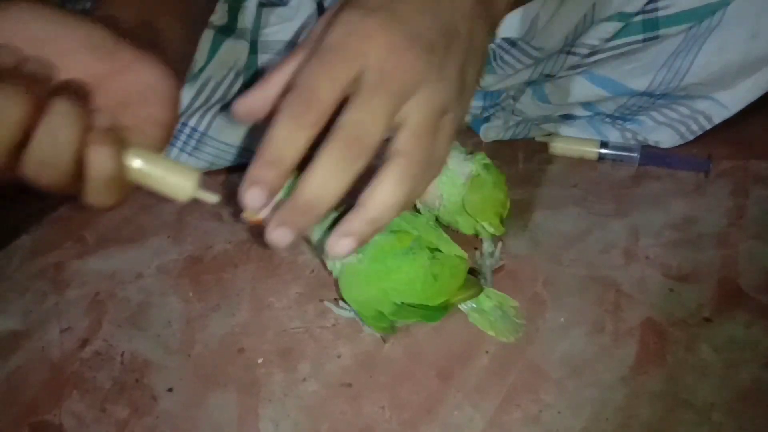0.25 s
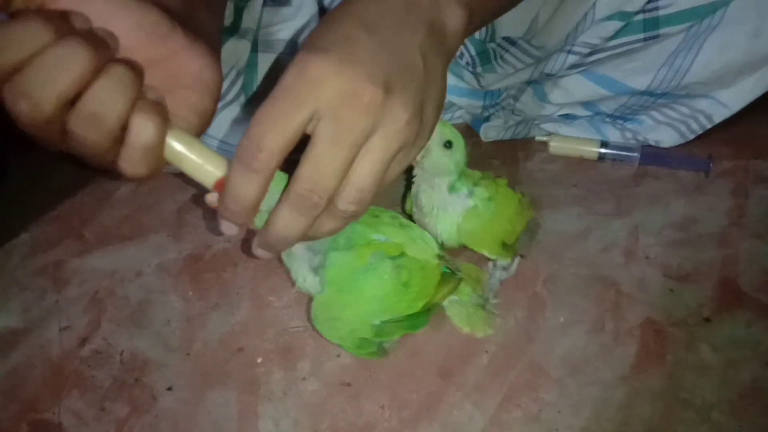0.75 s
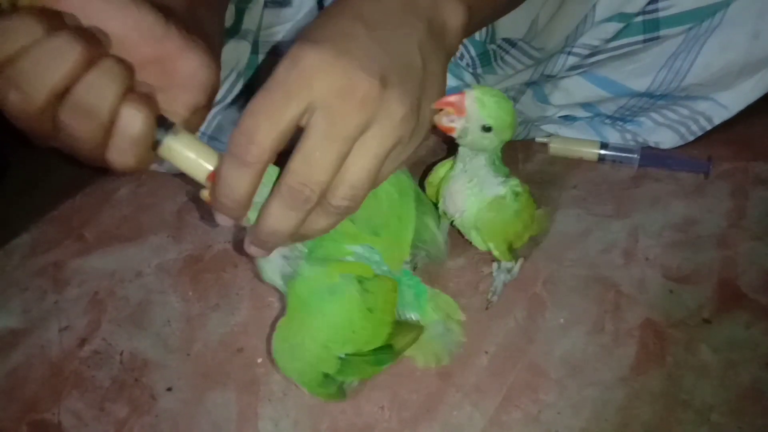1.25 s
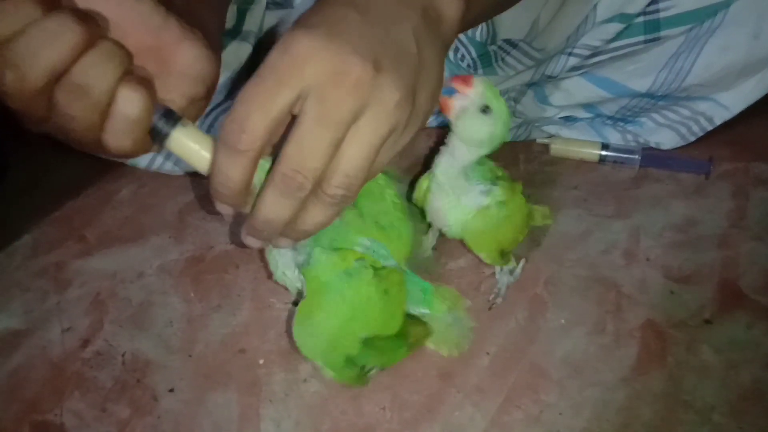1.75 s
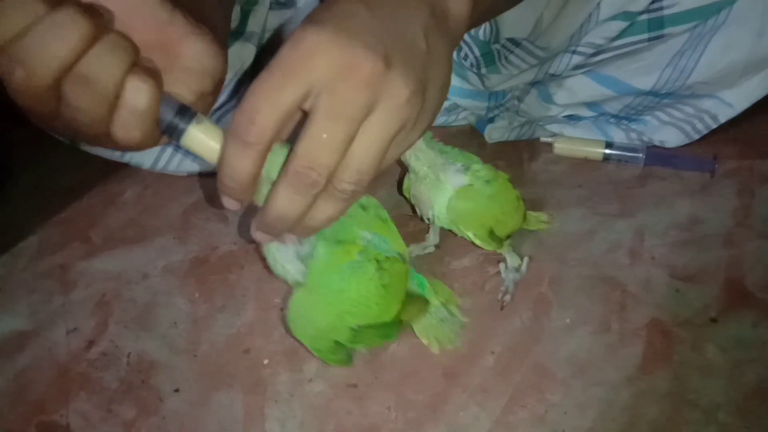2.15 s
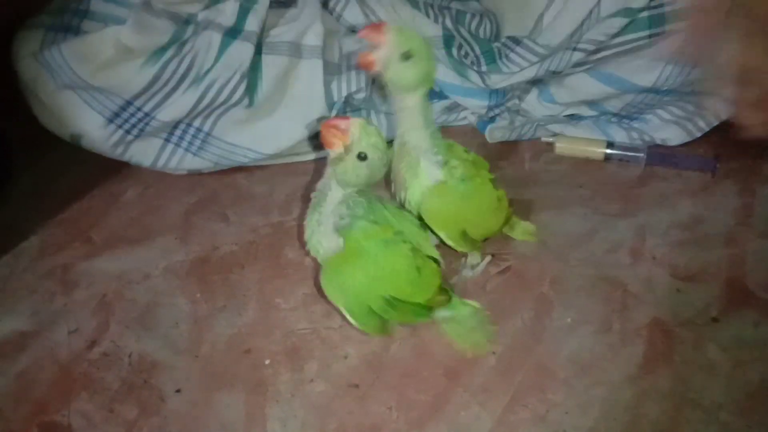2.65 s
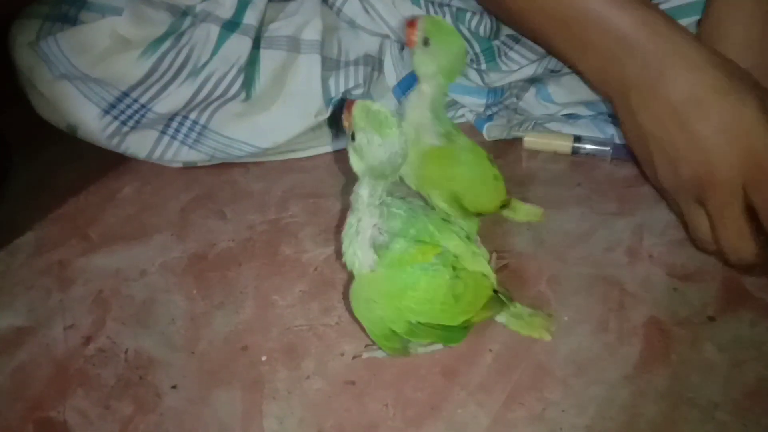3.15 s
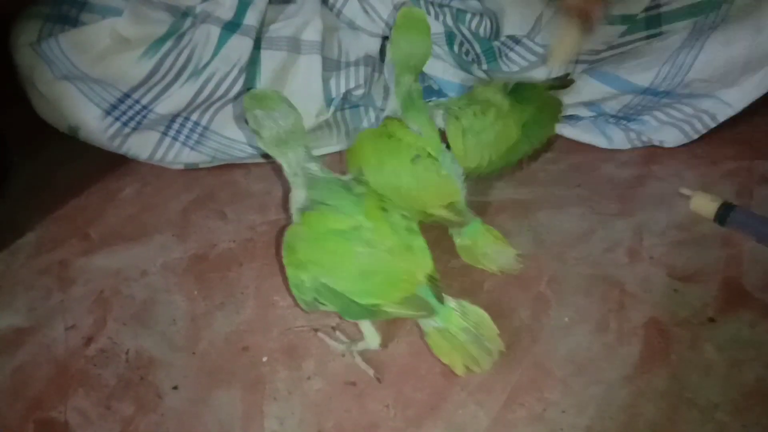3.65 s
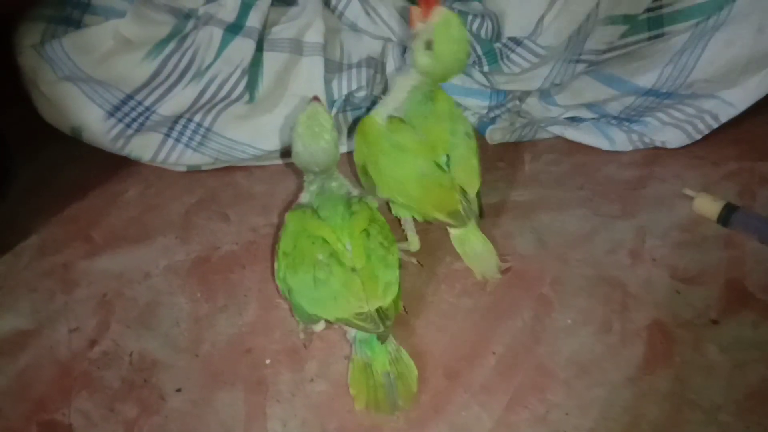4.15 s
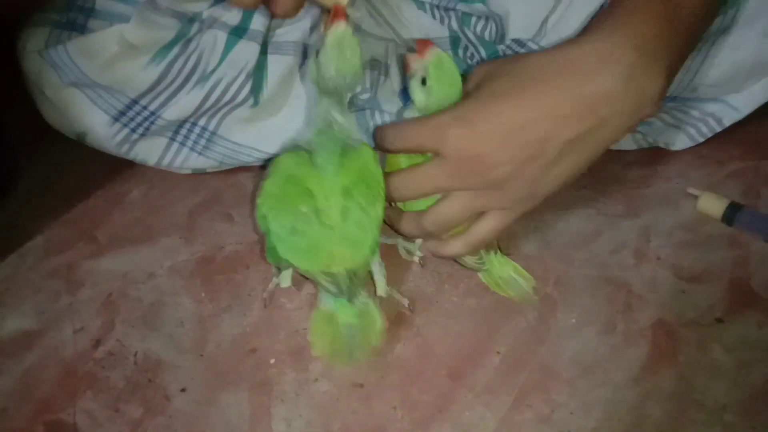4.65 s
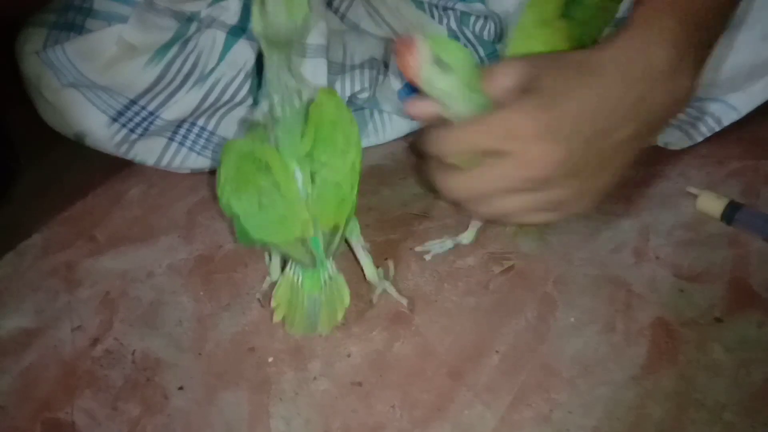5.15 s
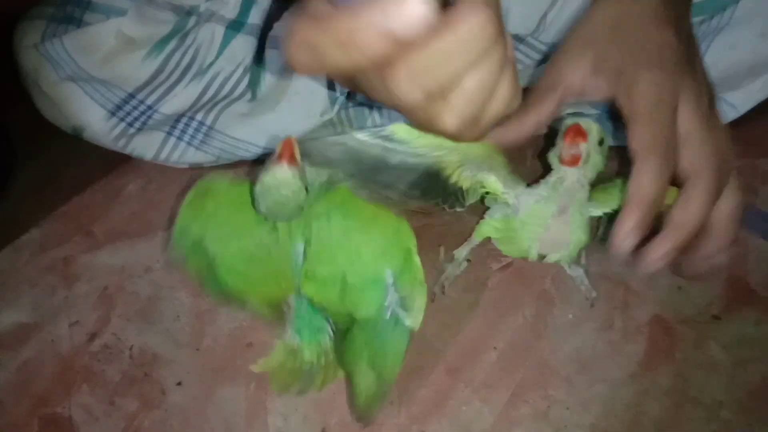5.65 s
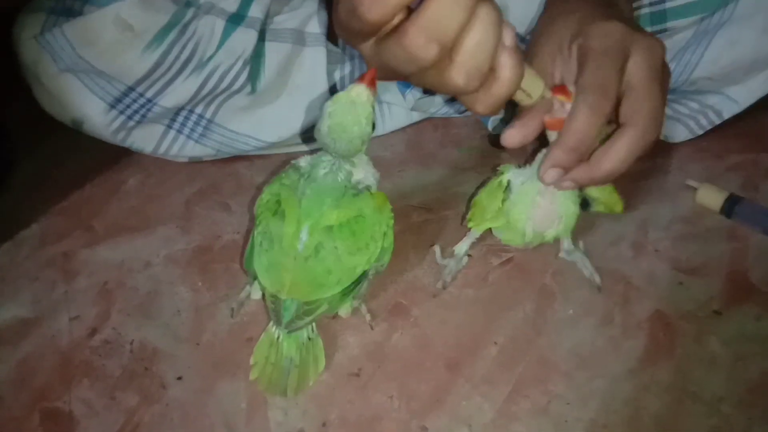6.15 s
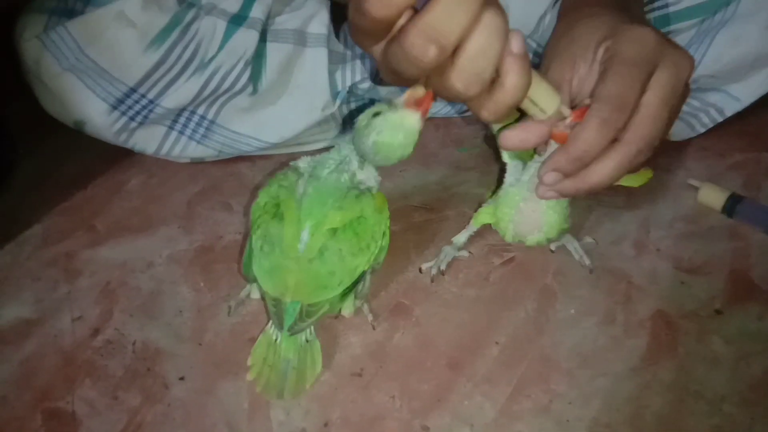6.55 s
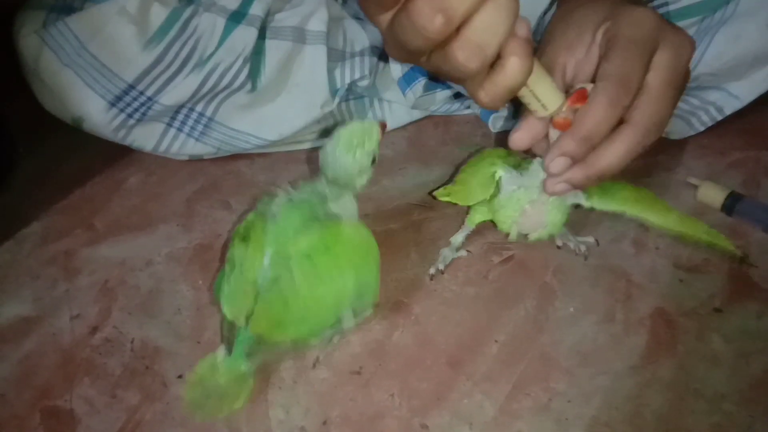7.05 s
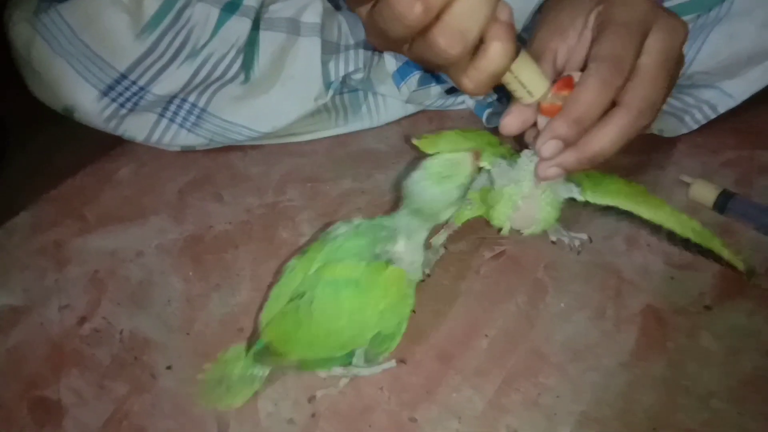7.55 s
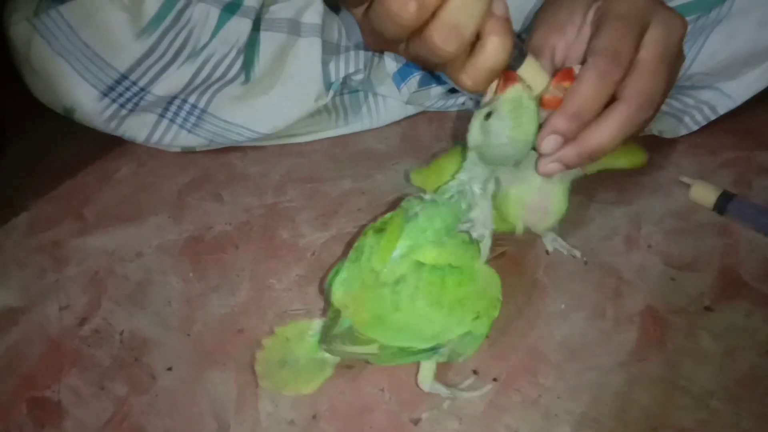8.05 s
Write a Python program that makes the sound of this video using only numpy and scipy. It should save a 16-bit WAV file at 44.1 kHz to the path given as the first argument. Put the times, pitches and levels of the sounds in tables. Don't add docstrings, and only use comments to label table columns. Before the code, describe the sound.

Young parrots beg restlessly, heard very near with short room echoes and faint low hum. Irregular airy rasps flutter over hoarser croaks from further off. After three seconds a hard claw tap leads into a quick run of nasal squawks, answered by small dropping chirps. Then soft sinking whistles appear, one louder rising note ends them, and harsh rasps and croaks carry on.

```python
import sys
import numpy as np
from scipy import signal
from scipy.fft import rfft, irfft, next_fast_len
from scipy.io import wavfile
from scipy.ndimage import uniform_filter1d

SR = 44100
rng = np.random.default_rng(int(sys.argv[2]) if len(sys.argv) > 2 else 0)


def invert_db(x):
    u = np.asarray(x, float) / 20
    return 10 ** u


def master_out(mix):
    frames = np.transpose(np.atleast_2d(mix))
    ceiling = np.clip(frames, -1, 1)
    pcm = np.round(ceiling * 32767).astype(np.int16)
    wavfile.write(sys.argv[1], SR, pcm)


N = 366471


def evened(x):
    return x / np.sqrt(np.mean(x ** 2) + 1e-20)


def read(points, hz):
    f, value = np.transpose(points)
    return np.interp(np.log(hz + 1), np.log(f + 1), value)


def colour(x, points):
    size = next_fast_len(len(x))
    gain = invert_db(read(points, np.fft.rfftfreq(size, 1 / SR)))
    return irfft(rfft(x, size) * gain, size)[:len(x)]


def add(mix, start, sound):
    part = mix[start:][:len(sound)]
    soft = sound * signal.windows.tukey(len(sound), min(1, 500 / len(sound)))
    part += soft[:len(part)]


def wander(size, hz):
    r = np.exp(-np.pi * hz / SR)
    z = rng.standard_normal(size) + 1j * rng.standard_normal(size)
    z = signal.lfilter([1], [1, -2 * r, r * r], z)
    return z / np.sqrt(np.mean(abs(z) ** 2))


def flutter(size, per_s, depth):
    turns = np.cumsum(per_s * np.exp(0.392 * wander(size, 60.13).real)) / SR
    puffs = 2 * np.sin(np.pi * turns) ** 2
    return evened(1 - depth + depth * puffs)


def hoarse(hz, width_hz, upper_db):
    turn = np.exp(2j * np.pi * np.cumsum(hz) / SR)
    z = wander(len(hz), width_hz)
    z = z / np.sqrt(abs(z))
    strength, smeared = abs(z), turn * z / abs(z)
    voice = sum(invert_db(db) * strength * smeared ** (k + 1) for k, db in enumerate(upper_db))
    beak_cut = signal.butter(5, [1170, 7900], "band", fs=SR, output="sos")
    return evened(signal.sosfilt(beak_cut, voice.real))


# (frequency [Hz], level [dB per Hz])
HUM_SPECTRUM = [(15, -32), (25, -13.5), (98, 5.5), (205, -4.5), (335, -7), (498, -14), (740, -11.5),
                (1100, -10.5), (1430, -45), (2420, -120)]


def air():
    swell = invert_db(1.5 * wander(N, 5).real)
    return invert_db(-63) * evened(colour(rng.standard_normal(N), HUM_SPECTRUM) * swell)


# (onset [s], length [s], first pitch [Hz], last pitch [Hz], level [dB])
WHISTLE_CALLS = [
    (-.03, 0.17, 1915, 1947, -22),
    (0.094, .068, 1820, 2590, -23),
    (5.357, 0.12, 1937, 1905, -28.5),
    (5.492, .11, 1950, 1880, -29),
    (5.633, 0.064, 1927, 1850, -30),
    (5.743, 0.1, 1907, 1837, -32),
    (5.883, 0.12, 1857, 2000, -22.5),
]


def whistle(s, length, first_hz, last_hz, level_db):
    u = np.arange(max(-s, 0), length, 1 / SR) / length
    edge = (2 * u ** 0.8 - 1) ** 2
    hz = first_hz + (last_hz - first_hz) * u - 0.014 * first_hz * edge
    turn = np.exp(2j * np.pi * np.cumsum(hz) / SR)
    breathy = turn * (1 + .12 * wander(len(u), 90))
    return round(max(s, 0) * SR), np.sqrt(2) * invert_db(level_db - 15.5 * edge) * breathy.real


def croak(s, length, hz, level_db, glide, smear_hz):
    u = np.linspace(0, 1, round(length * SR))
    voice = hoarse(hz * (1 + glide * (u - .5)), 0.82 * smear_hz, [0., -17, -24])
    effort = np.sin(np.pi * u ** 0.64)
    return round(s * SR), invert_db(level_db) * effort * voice * flutter(len(u), 145.6, 0.2)


# (frequency [Hz], level [dB])
MURMUR_SPECTRUM = [(900, -66.5), (1200, -9.5), (1550, -13.5), (2400, -3.5), (3700, 0), (4600, -11),
                   (6500, -12.5), (7200, -16), (9000, -38.5)]
# (onset [s], peak level [dB], time to die down [s])
MURMUR_SWELLS = [(0.0, -37, 0.49), (0.396, -36, 0.43), (.579, -38, 0.29), (0.867, -30.5, 0.2),
                 (1.172, -34, 0.91), (1.658, -35, 0.39), (1.984, -32.5, 0.091), (2.12, -37.5, .15),
                 (2.31, -32.5, 0.097), (2.599, -36, 0.26), (2.863, -35, 0.14), (3.006, -35, 0.23),
                 (3.303, -34, 0.095), (3.49, -37, 1), (3.886, -33, 0.073), (4.106, -32, 0.35),
                 (4.325, -31, 0.2), (4.535, -26, 0.042), (4.652, -30, 0.27), (4.969, -35.5, 0.38),
                 (5.246, -33, 0.62), (5.488, -40, 0.06), (5.761, -31.5, 0.44), (5.97, -28, 0.067),
                 (6.378, -34, 0.2), (6.64, -31.5, 0.53), (7.15, -35, 0.47), (7.565, -38.5, 0.081),
                 (7.691, -38, 0.6), (7.861, -37.5, 1)]


def brood():
    crowd = np.zeros(N)
    for when, pitch, glide, size in rng.random((420, 4)):
        start, length = when * (N / SR - .05), .025 + .05 * size
        add(crowd, *croak(start, length, 1200 + 4000 * pitch, 0., 0.155 * (glide - .5), 272))
    crowd = colour(evened(crowd) + invert_db(3) * rng.standard_normal(N), MURMUR_SPECTRUM)
    crowd /= np.sqrt(uniform_filter1d(crowd ** 2, 1500) + 1e-12)

    t, rise_db_per_s, die_db = np.arange(0, N, 64) / SR, 599.5, 13
    power = invert_db(2 * -51)
    for s, peak_db, die_s in MURMUR_SWELLS:
        rise_db = rise_db_per_s * np.maximum(s - t, 0)
        fall_db = die_db * (np.maximum(t - s, 0) / die_s) ** 1.7
        power = power + invert_db(2 * (peak_db - rise_db - fall_db))
    return 0, np.interp(np.arange(N) / SR, t, np.sqrt(power)) * crowd


# (onset [s], length [s], middle pitch [Hz], level [dB])
STEADY_NOTES = [(0.0, 0.19, 2950, -44.5), (.34, 0.13, 1303, -40), (.41, 0.15, 4850, -26),
                (.522, 0.091, 3720, -33.5), (.638, 0.13, 1283, -46), (1.561, 0.22, 2020, -44.5),
                (1.654, 0.045, 4210, -36), (1.721, 0.07, 2867, -30), (2.409, 0.059, 3800, -37.5),
                (2.531, 0.2, 1302, -47.5), (2.896, 0.11, 2860, -36), (3.124, .11, 1472, -46),
                (3.244, 0.094, 3430, -34), (3.874, 0.068, 3770, -23.5), (5.221, 0.043, 3570, -30),
                (5.487, 0.081, 1315, -44.5), (5.758, 0.086, 2810, -40), (5.958, 0.1, 3685, -30),
                (6.444, 0.36, 1870, -40.5), (6.697, 0.088, 3734, -26.5), (6.843, .11, 2660, -37.5),
                (6.912, 0.096, 2710, -41), (7.061, .05, 4130, -38), (7.147, 0.066, 2565, -39)]
RISING_NOTES = [(.341, 0.14, 3894, -29.5), (.683, 0.52, 1350, -48.5), (.736, .17, 2505, -41),
                (1.011, 0.09, 2480, -37.5), (1.434, 0.12, 2897, -37.5), (1.684, 0.21, 3636, -28),
                (1.896, 0.15, 3990, -35), (2.089, .11, 4140, -33), (2.161, 0.2, 2950, -35),
                (2.38, 0.23, 2690, -37), (2.58, .17, 4280, -34), (5.232, 0.15, 2860, -38.5),
                (5.331, 0.15, 3880, -32), (5.394, .18, 4260, -42), (6.114, 0.17, 4213, -23),
                (6.362, .11, 4170, -32), (6.665, .06, 2960, -35.5), (6.836, 0.2, 3800, -32),
                (7.122, 0.065, 4020, -36), (7.386, 0.16, 3710, -42.5)]
FALLING_NOTES = [(.007, 0.17, 1504, -43), (.878, 0.14, 3980, -33), (1.161, 0.091, 3830, -36),
                 (1.173, 0.092, 4480, -33.5), (1.448, 0.13, 3926, -28), (1.995, 0.34, 2765, -38.5),
                 (2.214, 0.13, 2167, -38.5), (2.779, 0.087, 4470, -34.5), (3.077, 0.18, 2850, -42.5),
                 (3.287, .24, 1560, -45.5), (3.513, 0.078, 3410, -42), (5.111, 0.16, 2376, -43.5),
                 (5.734, 0.13, 3606, -36.5), (6.488, 0.22, 4080, -43), (7.396, 0.21, 1960, -48),
                 (7.829, 0.2, 4060, -38), (7.999, 0.23, 2375, -39), (8.026, 0.2, 3480, -29)]
SQUEAK_NOTES = [
    (1.372, 0.084, 2304, -22.5),
    (6.615, .1, 2290, -24),
]


def grumbles(mix):
    kinds = [(STEADY_NOTES, -0.026, 270), (RISING_NOTES, 0.22, 725),
             (FALLING_NOTES, -.2, 560), (SQUEAK_NOTES, .28, 276)]
    for notes, glide, smear_hz in kinds:
        for note in notes:
            add(mix, *croak(*note, glide, smear_hz))


# (frequency [Hz], level [dB per Hz])
HISS_SPECTRUM = [(2240, -40.5), (3800, -13), (4680, -1), (6150, 3), (7210, -7.5), (8270, -14.5),
                 (10200, -24.5), (12800, -50), (14800, -20), (15700, -28)]
# (onset [s], swell up to the peak [s], peak effort [dB], beak resonance [Hz],
# wide hiss against effort [dB])
NEAR_RASPS = [(.329, 0.0199, -32, 4980, -28), (.417, 0.038, -18.5, 5580, -31.5),
              (0.549, 0.0373, -21, 5820, -21.5), (.88, .062, -26.5, 5570, -25.5),
              (1.187, 0.023, -27, 5080, -24), (1.384, 0.0245, -28, 4970, -26.5),
              (1.772, 0.016, -21.5, 5750, -23.5), (1.956, 0.029, -23.5, 5980, -21),
              (2.1, 0.0206, -29, 5420, -25), (2.595, 0.093, -22, 6070, -24),
              (2.781, 0.0162, -26, 5255, -27), (3.111, 0.028, -21, 5460, -36),
              (3.98, 0.084, -19.5, 5300, -34), (4.48, 0.0248, -25.5, 5220, -43),
              (5.475, 0.0404, -18.5, 5850, -23), (5.785, 0.0064, -41.5, 5300, -43),
              (6.094, 0.0068, -32.5, 4790, -26), (6.156, 0.0314, -20, 4890, -44),
              (6.396, 0.017, -23, 5920, -25), (6.632, 0.032, -34.5, 4990, -22.5),
              (6.824, 0.0265, -20.5, 5920, -21), (7.175, 0.0047, -35, 4980, -52),
              (7.838, 0.063, -16, 6200, -24), (8.08, 0.0438, -25, 5410, -23)]


def rasp(onset, swell, peak_db, beak_hz, hiss_db):
    lead_s, tail_s = .04, .2
    leap_db_per_s, swell_db_per_s, fade_db_per_s = 1092.5, 129, 269.5
    t = np.arange(-lead_s, swell + tail_s, 1 / SR)
    drop_db = leap_db_per_s * np.maximum(-t, 0)
    drop_db = drop_db + swell_db_per_s * np.clip(swell - t, 0, swell)
    drop_db = drop_db + fade_db_per_s * np.maximum(t - swell, 0)

    hz = beak_hz - 12 * drop_db
    ring = hoarse(hz, 570, [0.])
    hiss = evened(colour(rng.standard_normal(len(t)), HISS_SPECTRUM))
    wide_db = np.minimum(hiss_db + 21.0, -1.5)
    breath = invert_db(wide_db) * hiss + np.sqrt(1 - invert_db(2 * wide_db)) * ring
    return round((onset - lead_s) * SR), invert_db(peak_db - drop_db) * flutter(len(t), 130, .3) * breath


# (frequency [Hz], width [Hz], level [dB])
FLOOR_RINGS = [
    (452, 41, -39.5),
    (2600, 1260, -2.5),
    (6840, 740, 1),
    (9700, 9000, -30),
]
# (onset [s], peak level [dB])
CLAW_TAPS = [
    (1.1034, -41),
    (3.038, -27),
    (3.2989, -12.5),
    (3.338, -28),
    (3.3491, -25.5),
]


def taps():
    out, t = np.zeros(N), np.arange(2000) / SR
    ring = sum(invert_db(db) * np.exp(-np.pi * width * t) * np.sin(2 * np.pi * hz * t)
               for hz, width, db in FLOOR_RINGS)
    contact = 1 - np.exp(-t / 0.000074)
    for s, peak_db in CLAW_TAPS:
        out[round(s * SR):][:len(t)] += invert_db(peak_db + 4.5) * ring * contact
    return out


# (onset [s], length [s], first pitch [Hz], level [dB], overtones [dB])
ANSWERING_CHIRPS = [
    (3.436, .1, 1700, -35, -40),
    (3.642, .065, 1880, -25, -9),
    (3.815, .045, 2000, -24, -10),
    (3.972, .055, 2050, -21, -12),
    (4.135, .065, 2050, -23, -9),
    (4.303, .07, 2100, -23, -7),
]


def chirp(s, length, first_hz, level_db, overtone_db):
    u, end_hz = np.linspace(0, 1, round(length * SR)), 1221
    hz = end_hz + (first_hz - end_hz) * np.exp(-(2.7 * u) ** 1.8)
    phase = 2 * np.pi * np.cumsum(hz) / SR
    low = invert_db(-5.0) * np.cos(phase) + np.cos(2 * phase)
    high = sum(invert_db(db - 110 * abs(u - .38)) * np.cos((k + 3) * phase) for k, db in enumerate([-6., 6., 3]))
    return round(s * SR), invert_db(level_db - 11 * u) * (low + invert_db(overtone_db + 4) * high)


# (frequency [Hz], level [dB])
THROAT_SPECTRUM = [(450, -48), (650, -29), (1280, -15), (1750, -18.5), (2650, -17.5), (3820, -6),
                   (5300, -8.5), (6900, -9.5), (11000, -29.5), (13000, -45), (15200, -25)]
# (onset [s], length [s], top pitch [Hz], bend [share of pitch], roughness [0-1])
ARCHED_SQUAWKS = [
    (3.771, 0.124, 1403, 0.34, 0.42),
    (3.982, 0.15, 1348, 0.55, 0.36),
    (4.204, 0.15, 1284, 0.61, 0.25),
    (4.423, .135, 1345, 0.11, 0.44),
    (4.64, .127, 1433, 0.45, 0.7),
    (4.852, .13, 1331, 0.39, 0.27),
]


def arch(s, length, top_hz, bend, rough):
    t = np.arange(0, length, 1 / SR)
    u = t / length
    ends = 0.49 * np.exp(-(t / 0.014) ** 2) + .42 * np.exp((t - length) / 0.015)
    jitter = 1 + (.006 + .012 * rough) * wander(len(t), 60).real
    hz = top_hz * (1 - bend * (u - .3) ** 2 - ends) * jitter
    phase = 2 * np.pi * np.cumsum(hz) / SR

    whole = np.zeros(len(t))
    for k in range(1, 12):
        shimmer_db = (.8 + .8 * k) * wander(len(t), 60).real
        loss_db = 26 * (k - 1) * ends + .16 * k * k
        level_db = read(THROAT_SPECTRUM, k * hz) + shimmer_db - loss_db
        whole += invert_db(level_db) * np.cos(k * phase + .5 * k * k)

    half = sum(invert_db(read(THROAT_SPECTRUM, (k + .5) * hz) - 4.5 * k) * np.cos((k + .5) * phase)
               for k in range(1, 8))
    alternation = .25 + 2.2 * np.exp(-((u - .7) / .1) ** 2)
    breath = evened(colour(rng.standard_normal(len(t)), THROAT_SPECTRUM)) * (.04 + .55 * rough + 2.3 * ends)
    effort = np.sin(np.pi * u ** 0.99) ** 0.088 * np.minimum(0.22 + t / 0.034, 1)
    voice = (whole + alternation * half) / np.std(whole)
    return round(s * SR), invert_db(-23.5) * effort * (voice + breath)


def bounces(direct):
    paths = [(.0011, -29.5), (.0027, -31.5), (.0046, -10.5)]  # (delay [s], level [dB])
    return sum(invert_db(db) * np.roll(direct, round(s * SR)) for s, db in paths)


# (frequency [Hz], time to fall 60 dB [s])
ROOM_DECAY = [(500, 0.46), (1300, 0.42), (4000, 0.42), (15000, 0.22)]


def room(x):
    echoes = np.zeros(SR // 2)
    at = np.arange(120, len(echoes) - 20, 20)
    echoes[at + rng.integers(0, 20, len(at))] = rng.choice([-1., 1.], len(at))
    hz, t, z = signal.stft(echoes, SR, nperseg=256)
    decay = invert_db(-60 * t / read(ROOM_DECAY, hz)[:, None])
    tail = signal.istft(z * decay, SR, nperseg=256)[1]
    r, w = np.exp(-np.pi * 10 / SR), 2 * np.pi * 1240 / SR
    ring = signal.lfilter([2 * (1 - r) * np.sin(w)], [1, -2 * r * np.cos(w), r * r], x)
    return signal.fftconvolve(x, tail / np.linalg.norm(tail))[:N] + invert_db(12) * ring


def noise_gate(x):
    hz, t, z = signal.stft(x, SR, nperseg=512)
    power = uniform_filter1d(abs(z) ** 2, size=5, axis=0)
    power = uniform_filter1d(power, size=3, axis=1)
    level_db = 10 * np.log10(power + 1e-16)
    over_db = level_db - np.percentile(level_db[:, ::2], 12, axis=1, keepdims=True)
    closed = np.clip(1 - over_db / 5, 0, 1) * (hz[:, None] > 1500)
    return signal.istft(z * invert_db(-5 * closed), SR, nperseg=512)[1][:N]


# (frequency [Hz], level [dB])
PORT_RESPONSE = [
    (5900, 2),
    (6550, 0),
    (7150, 6.5),
    (7900, -0.5),
]


def microphone(x):
    return colour(x, PORT_RESPONSE)


def scene():
    rough, clear = np.zeros(N), taps()
    add(rough, *brood())
    grumbles(rough)
    for row in NEAR_RASPS:
        add(rough, *rasp(*row))
    for voice, rows in [(whistle, WHISTLE_CALLS), (chirp, ANSWERING_CHIRPS), (arch, ARCHED_SQUAWKS)]:
        for row in rows:
            add(clear, *voice(*row))
    wet = room(invert_db(-10) * rough + invert_db(-12) * clear)
    direct = rough + clear
    return (invert_db(-2.0) * (direct + bounces(direct)) + wet + air())[None]


def low_pass(x):
    return signal.sosfilt(signal.butter(12, 16640, fs=SR, output="sos"), x)


def record(dry):
    heard = microphone(noise_gate(dry[0]))[None]
    limited = .6 * np.tanh(heard / .6)
    edge = signal.firwin(511, 15750, window=("kaiser", 9), fs=SR)
    mix = signal.oaconvolve(limited, edge[None], "same")
    return low_pass(mix)


dry = scene()
out = record(dry)
master_out(out)
```